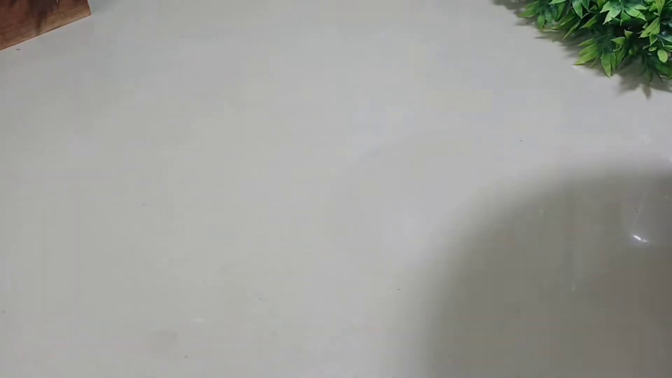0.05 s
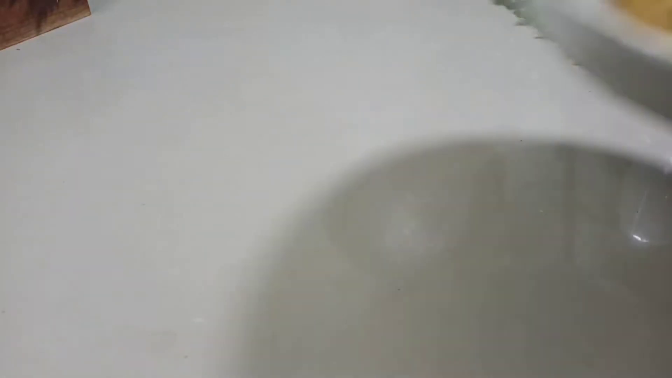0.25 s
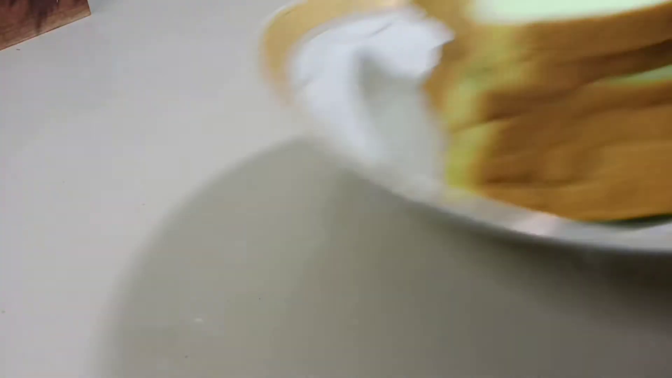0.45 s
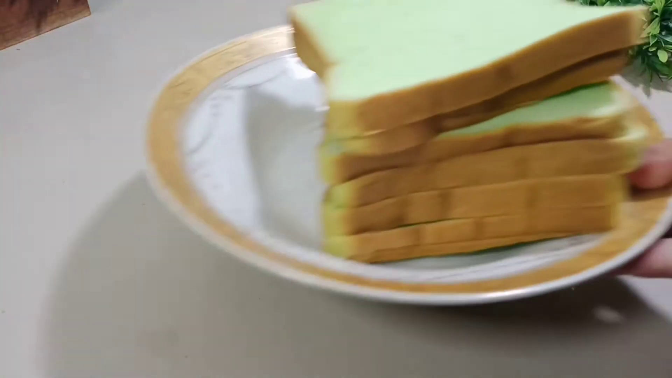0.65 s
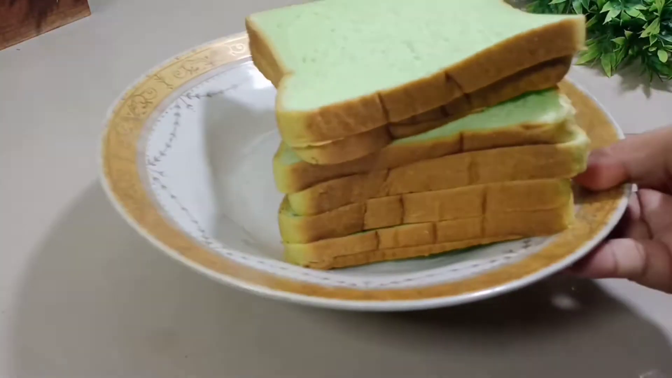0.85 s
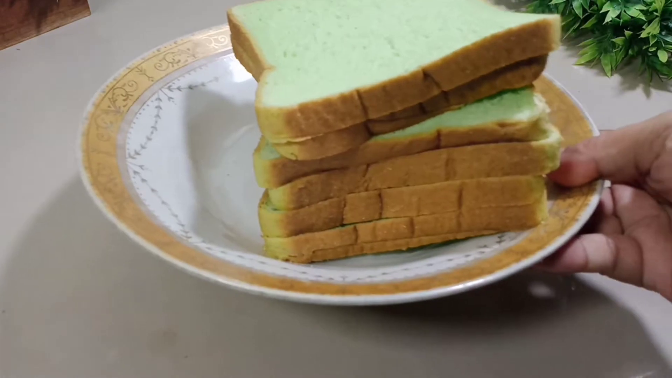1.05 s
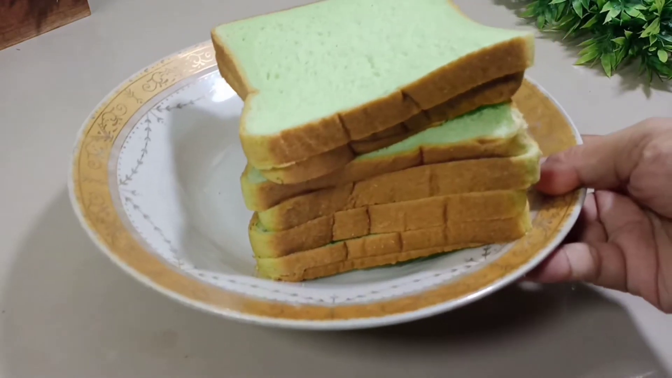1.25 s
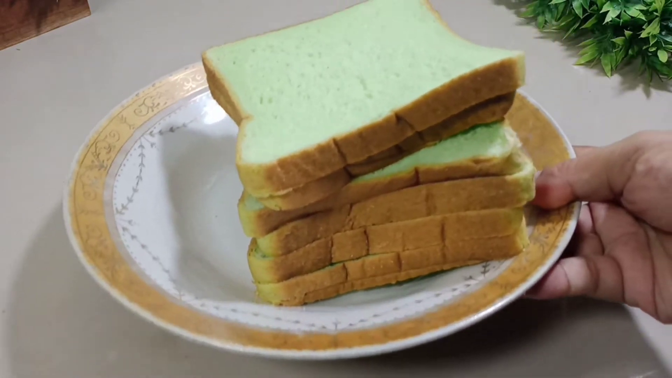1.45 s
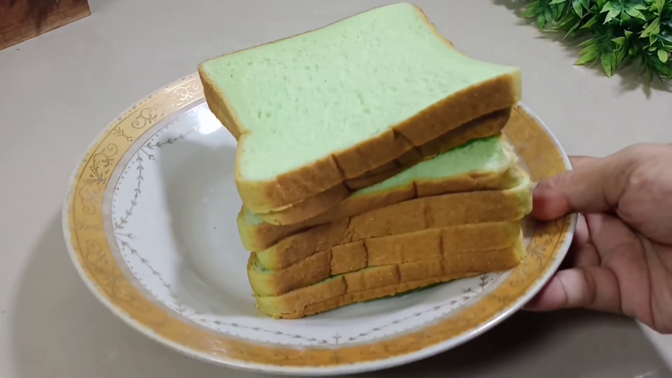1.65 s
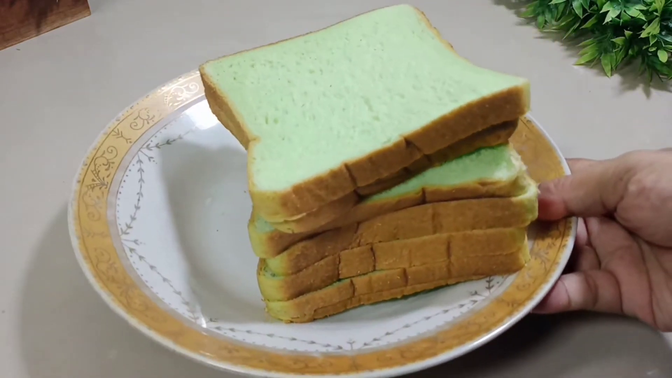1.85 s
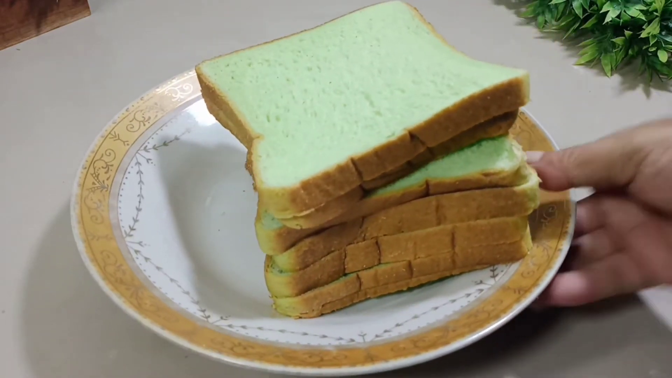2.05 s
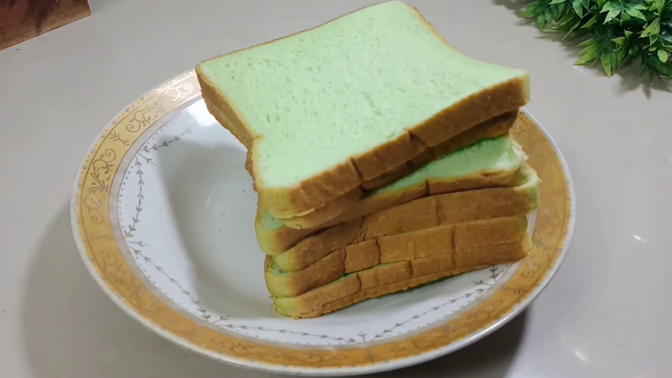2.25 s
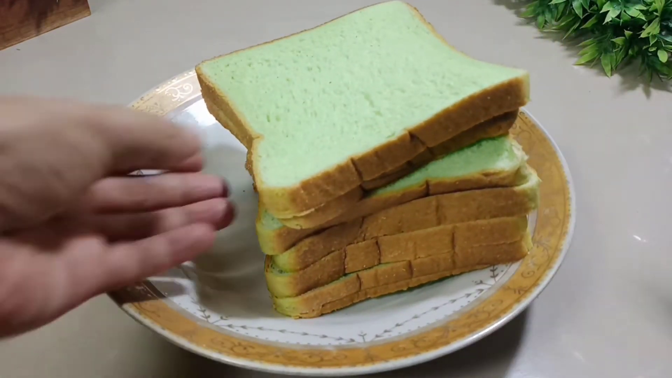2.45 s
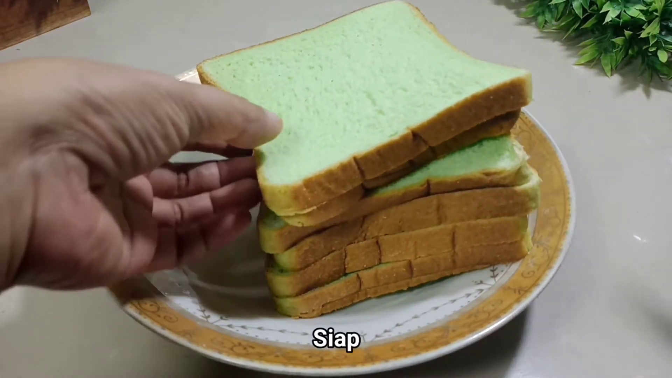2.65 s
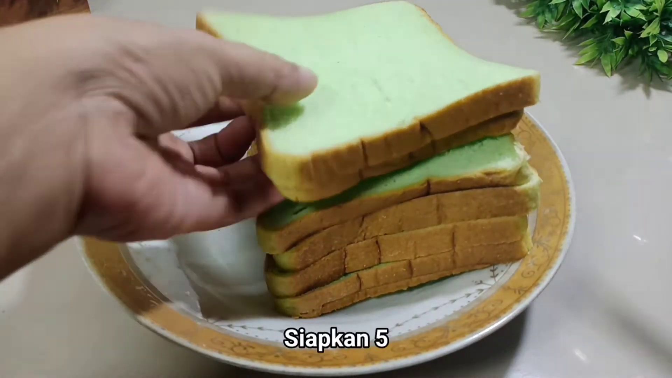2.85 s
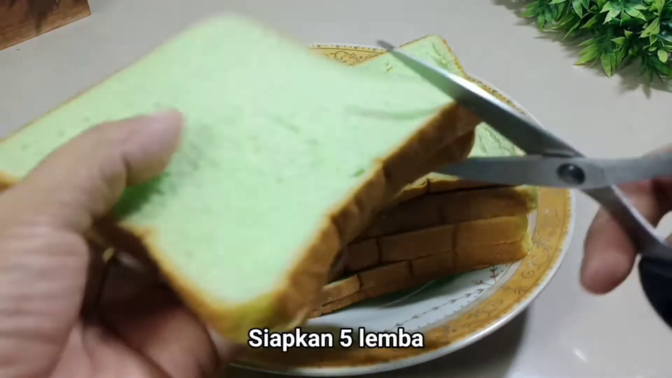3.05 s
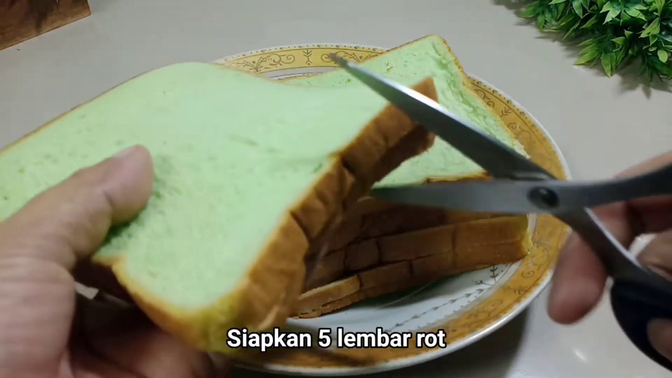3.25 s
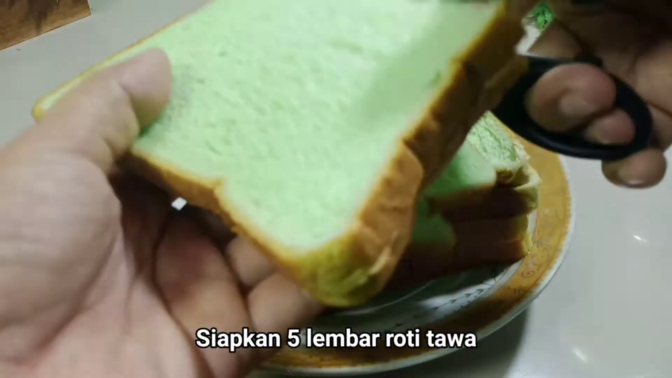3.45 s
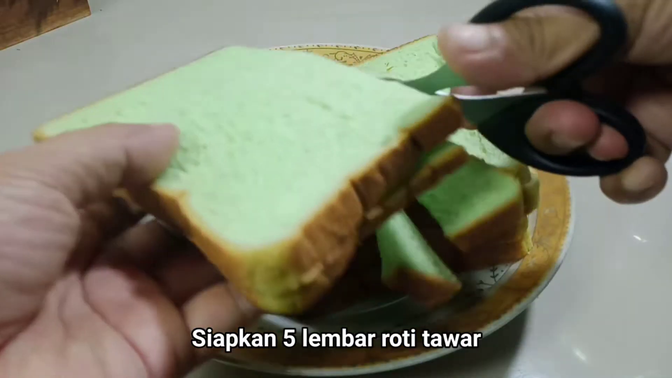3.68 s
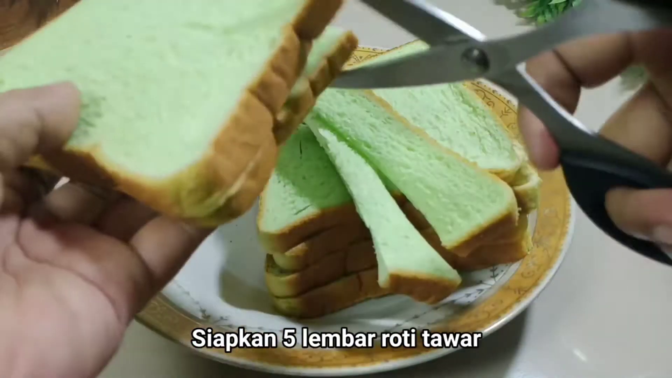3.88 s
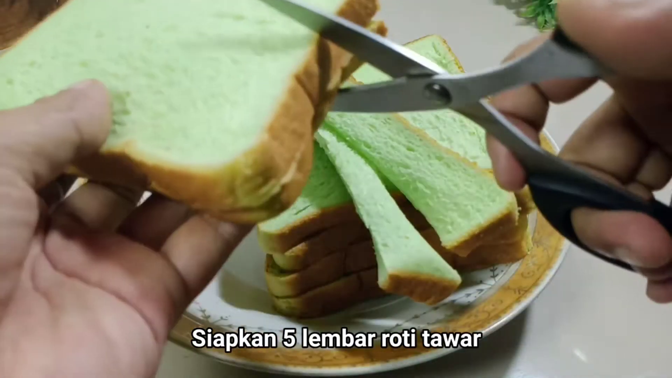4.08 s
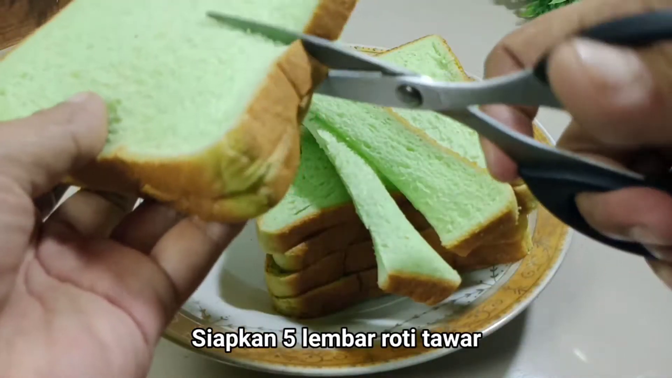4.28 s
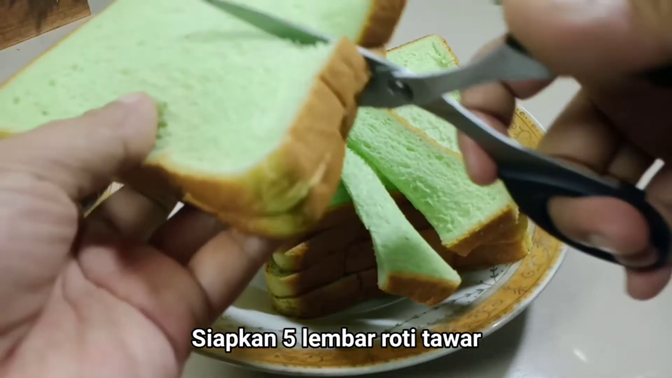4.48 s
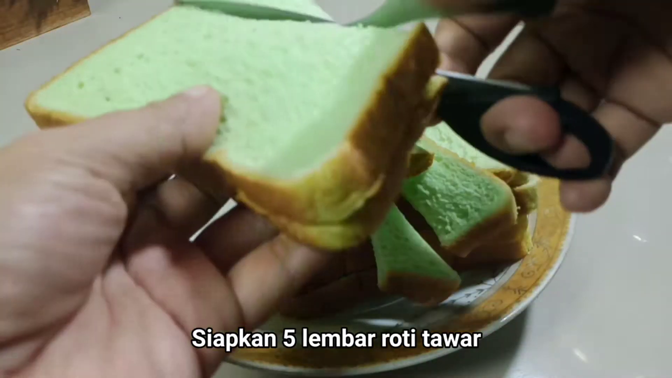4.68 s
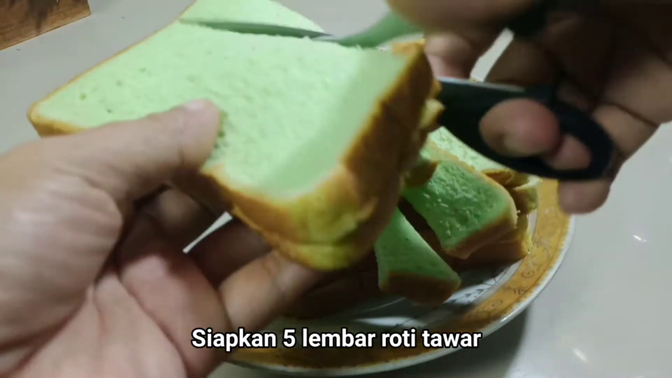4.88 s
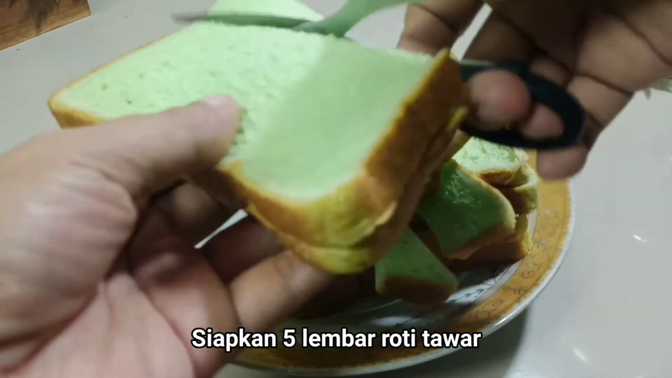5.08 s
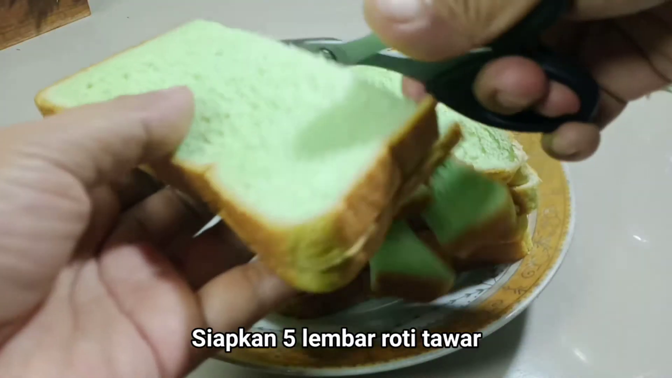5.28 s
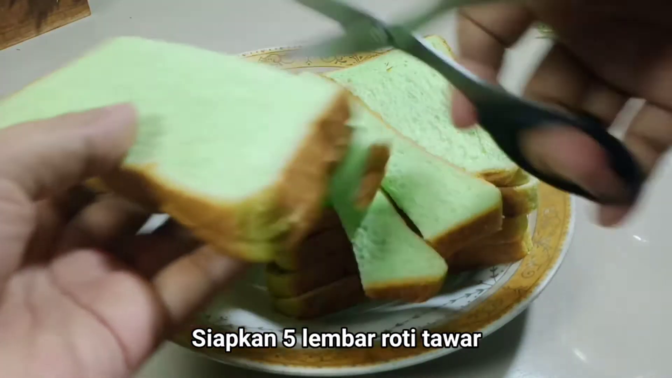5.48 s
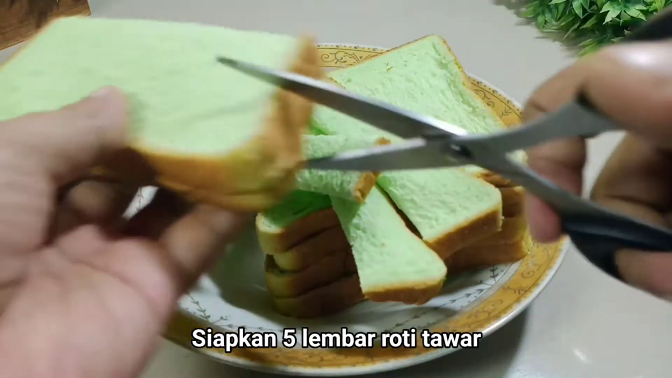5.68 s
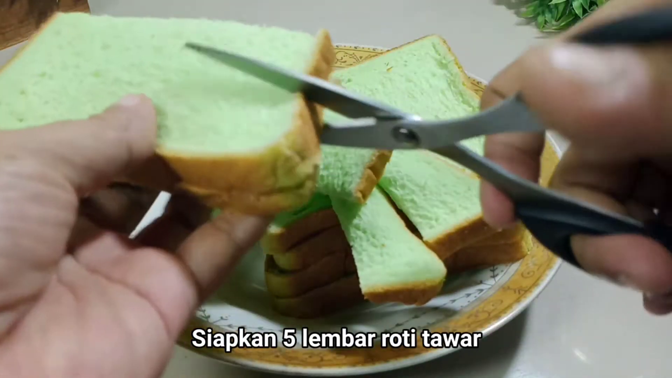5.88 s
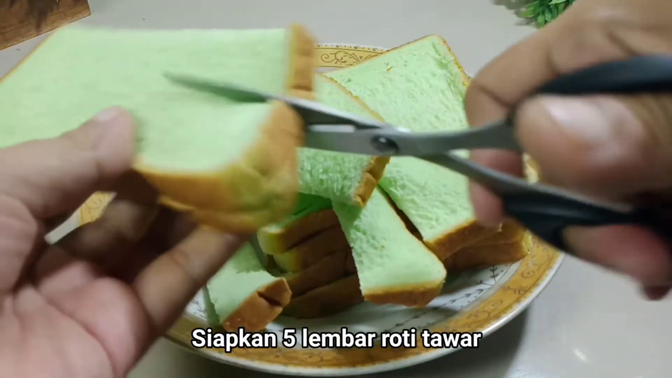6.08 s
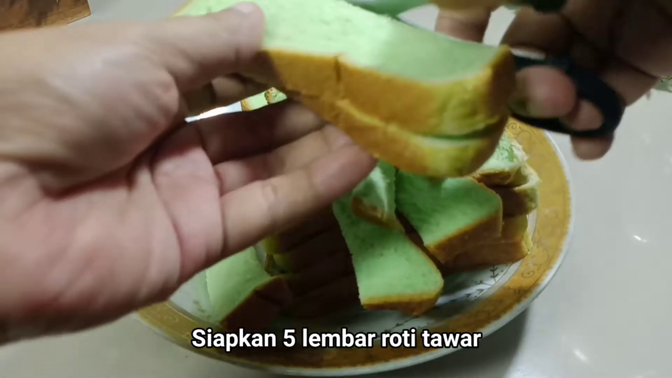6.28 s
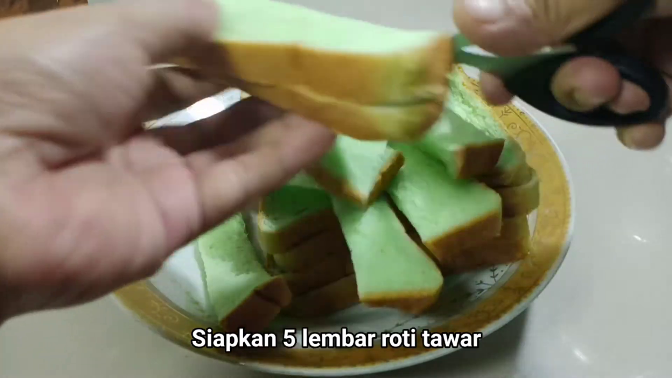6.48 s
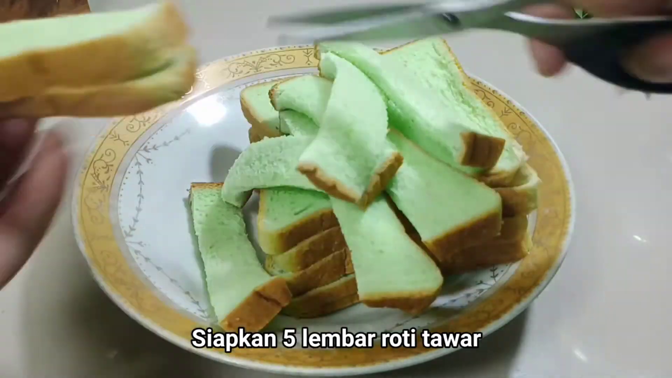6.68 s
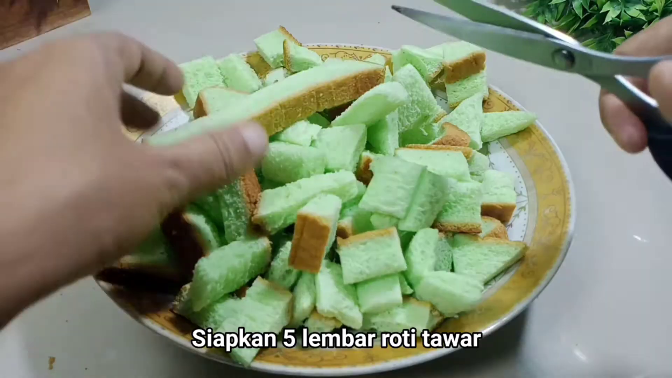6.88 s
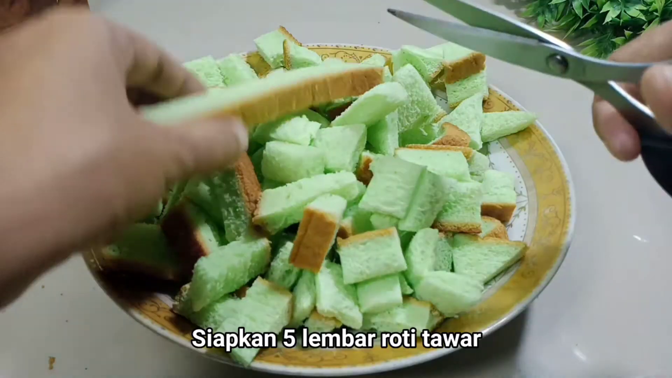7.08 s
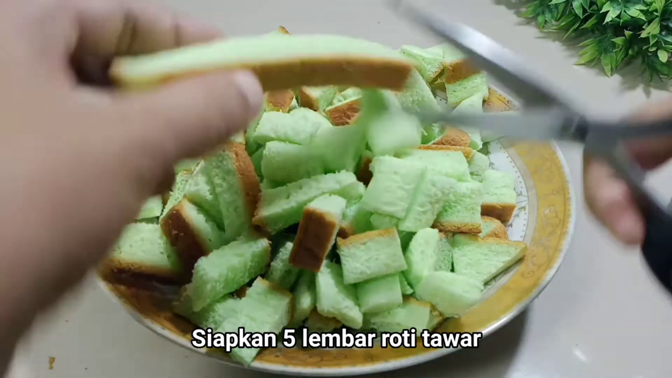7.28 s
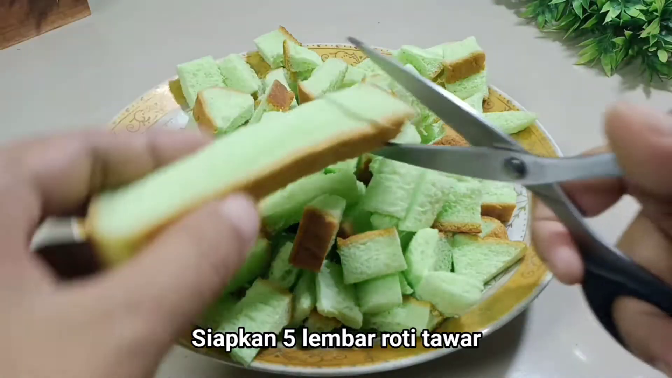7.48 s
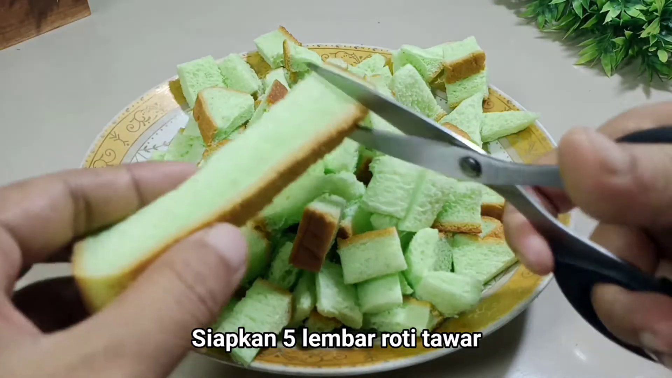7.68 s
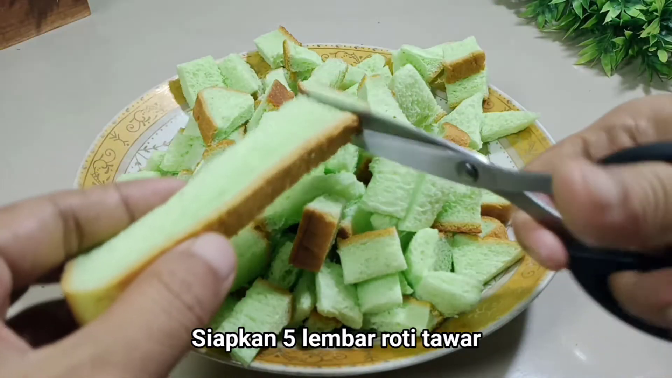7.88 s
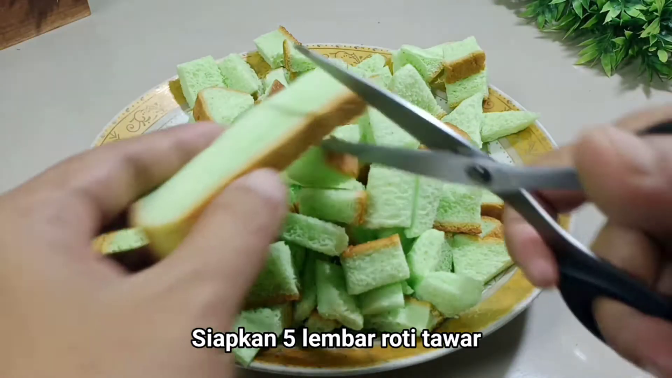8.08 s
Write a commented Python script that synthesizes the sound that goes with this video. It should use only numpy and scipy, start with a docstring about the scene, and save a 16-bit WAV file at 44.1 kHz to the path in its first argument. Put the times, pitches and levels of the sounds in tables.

```python
"""First you hear a china plate of bread judder, scrape and squeak over a glossy table as its foot ring
catches and slips. It is set down with a clatter. Kitchen scissors then cut the soft slices almost
silently: the handles clack shut and the pivot ticks as they open. Behind it all the kitchen hisses and
a distant motor hums. The sound runs in short stretches, some sped up, which raises the pitch of the
scissors and the background and makes the scissors ring more briefly."""
import sys
import numpy as np
from scipy import signal
from scipy.fft import rfft, irfft, next_fast_len
from scipy.io import wavfile

SR = 44100
rng = np.random.default_rng(int(sys.argv[2]) if len(sys.argv) > 2 else 0)


def int16_out(signal):
    """Quantize to a 16-bit WAV file."""
    q = np.round(np.clip(np.atleast_2d(signal).T, -1, 1) * 32767)
    wavfile.write(sys.argv[1], SR, q.astype(np.int16))


N = 358974
TIME = np.arange(N) / SR
RING_TIME = TIME[:SR // 2]   # half a second for a hit to ring out

# Stretches of sound. Each row: start in seconds, speed factor, then room noise, hum and whine in dB.
STRETCHES = [(0, 1.034, -49, -53, -60), (1.02, 1.01, -59, -65.5, -67.5), (2.0, 1.01, -63, -61, -77),
             (2.5, 1.42, -68.5, -72.5, -77.5), (3.5, 1.87, -69.5, -74.5, -79.5), (4.76, 1, -63, -70, -77),
             (5.5, 1.67, -71, -75.5, -83.5), (6.95, 1.01, -65, -70, -74.5)]
# Tone colours of five noises. Each row: frequency in Hz, relative level in dB.
SCRAPE_COLOUR = [(250, -29), (450, -8), (700, -2.5), (1100, 1.5), (1800, -1.5), (2700, -2), (4500, -6),
                 (6000, -10.5), (8500, -13), (11000, -16), (15000, -23)]
RUMBLE_COLOUR = [(21, -47), (35, -31), (54, -14), (168, 0.5), (273, -2), (360, -13.5), (429, -5.5),
                 (559, -13), (700, -11.5), (910, -40), (1540, -120)]
ROOM_COLOUR = [(20, -22), (50, -9.5), (85, -5.5), (140, -4.5), (200, -8), (300, -9.5), (450, -14.5),
               (800, -16.5), (2000, -21), (4600, -25.5), (7200, -31.5), (8400, -28.5), (11000, -34),
               (15000, -37)]
CLATTER_COLOUR = [(50, -25), (130, -11), (300, -7.5), (500, -1), (750, 4), (1200, -3), (1700, -2),
                  (2500, -1), (4000, -9.5), (6000, -13.5), (9000, -16), (11000, -20.5), (15000, -27)]
CRUMB_COLOUR = [(500, -16), (2000, -6), (6000, -2), (9000, -6.5), (15000, -2.5)]
# Notes of the sliding plate. Each row: start and length in seconds, pitch in Hz, drop by the end in Hz,
# curve of the drop (1 is straight), level in dB, fade-in in seconds, fade-out in dB per second.
JUDDER_NOTES = [(0, 0.21, 64.1, 2.2, 0.7, -47.5, 0.015, 31), (.25, 0.468, 62.5, 0.41, 2.2, -43, 0.035, -6)]
SQUEAK_NOTES = [(.272, .205, 3200, 210, .85, -41, 0.016, 18), (.38, 0.08, 2090, 17, 1, -58, .015, 12),
                (.435, 0.12, 1414, 34, 1, -47.5, 0.017, 45)]
SQUEAL_NOTES = [(.44, 0.29, 2016, 513, 1.88, -31.5, 0.039, 40.4),
                (.695, 0.11, 1435, 193.7, 0.97, -37.5, 0.012, 13),
                (.785, 0.11, 1095, 229.6, 0.82, -45, 0.011, 10)]
# Overtones of those notes. Each row: multiple of the pitch, relative level in dB.
JUDDER_OVERTONES = [(1, -11), (2, 2.5), (3, -18), (4, -9), (5, -4), (6, -11)]
SQUEAK_OVERTONES = [(1, 5.5), (2, -12.5), (3, -40)]
SQUEAL_OVERTONES = [(1, 1), (2, -6.5), (3, -10), (4, -23), (5, -23.5), (6, -28), (7, -32)]
# Swells. Each row: peak time in seconds, level in dB, seconds to rise by 20 dB, seconds to fall by 20 dB.
FOOT_BITES = [(0.096, -39, 0.02, 0.18), (.785, -39.5, 0.19, 0.33)]   # the foot ring bites into the table
HUM_SWELLS = [(4.45, 4.5, 0.98, 0.81)]   # level counted from the steady hum
BREAD_RUBS = [(1.031, -62, 0.041, 1.2), (2.421, -74, 0.68, .15), (3.15, -84, 2.5, 1.1),
              (5.02, -73, .2, 0.14), (5.57, -88, 0.16, .15), (5.75, -81.5, 0.11, .11),
              (6.13, -74, .12, .11), (7.5, -85, 1.2, 1.5), (7.975, -55.5, .025, 0.075), (8.1, -73, .2, .4)]   # fingers and blades rub the bread
# Ringing tones at normal speed. Each row: pitch in Hz, width in Hz (narrow rings longer), level in dB.
MOTOR_TONES = [(73.3, 9, -1), (118, 16, -6)]
PLATE_TONES = [(130.2, 6, -9), (268, 20, -0.5), (330, 32, 3.5), (412, 20, 2.5), (530, 27, -3), (668, 52, 0),
               (733, 59, 3), (777, 9.2, -0.5), (1050, 64, -1), (1353, 80, 3), (1794, 45, -10.5),
               (2140, 50, -4), (2470, 140, -4.5), (8520, 240, -12)]   # plate and table together
RIM_TONES = [(2650, 29, 1), (3240, 18, 6), (4400, 29, -1), (5700, 29, -1), (6900, 55, -5), (8420, 29, -7),
             (10400, 60, -13)]
HANDLE_TONES = [(1930, 570, -2), (3300, 700, -3.5), (4600, 2600, -4), (7160, 560, 3), (8400, 530, 4),
                (9460, 1000, 1), (12300, 1500, -5.5), (14950, 800, -7)]
BLADE_TONES = [(1350, 330, 1.5), (3210, 280, 1), (6070, 1500, -5), (7060, 420, 0), (8870, 1300, 4),
               (11890, 1100, -2), (14600, 1800, -3)]
# The motor speeds up. Each row: peak time in seconds, added Hz at normal speed, rise and fall in seconds.
MOTOR_SURGES = [(3.42, 40.07, .55, .1), (4.0, 40, .85, 1.2)]
# The background dips briefly. Each row: time in seconds, depth in dB, seconds to sink, seconds to return.
BACKGROUND_DIPS = [(4.76, 16.5, 0.092, .11), (6.335, 7.5, .045, .055), (6.93, 5, 0.2, 0.082)]
# The plate hits the table. Each row: start in seconds, level in dB, Hz above which the knock is dulled.
PLATE_KNOCKS = [(0.0979, -14.5, 7000), (1.590, 14.5, 5570), (1.799, -4.5, 1750), (1.823, 8.5, 2420),
                (1.832, 6, 4940), (1.8424, 11, 8000), (1.8448, 8.5, 1800), (1.9217, 2, 3020),
                (1.926, -1.5, 800)]
# A fingernail brushes the rim. Each row: start in seconds, level in dB.
RIM_CLINKS = [(2.08, -30)]
# The handles shut. Each row: time in seconds, level in dB, brightness in dB per octave, relative thump dB.
HANDLE_CLACKS = [(3.6790, -2.5, -0.6, -15), (5.2969, 12.5, 2, -24), (6.42, -2.5, 1, -13.5),
                 (7.9875, 7, -2.5, -5.5)]
# The blades part. Each row: start in seconds, level in dB.
PIVOT_TICKS = [(3.7677, -26.5), (5.4566, -15), (6.55, -26.5), (8.1059, -14.5)]
# The kitchen's echo. Each row: frequency in Hz, seconds to fade by 60 dB, both at normal speed.
ECHO_TIMES = [(150, .4), (700, 0.33), (2000, .36), (5000, 0.27), (9000, 0.22), (15000, .22)]

SLIDE_END_S, CUTOFF_HZ = STRETCHES[1][0], 15550
PORT_HZ, PORT_WIDTH_HZ, PORT_DB = 8220, 1200, 3.5   # the microphone's opening rings (Hz at normal speed)


def from_db(db):
    """Turn decibels into a volume factor."""
    return 10 ** (np.asarray(db) / 20)


def rms_one(x):
    """Scale a sound to an average power of 1."""
    return x / np.sqrt(np.mean(x ** 2) + 1e-20)


def unit_energy(x):
    """Scale a sound to a total energy of 1."""
    return x / np.sqrt(np.sum(x ** 2) + 1e-20)


def add(out, s, x):
    """Mix x into out, starting at s seconds."""
    at = max(round(s * SR), 0)
    out[at:at + len(x)] += x[:N - at]


def drift(rate_hz, count=N):
    """A smooth random wobble, about 1 in size."""
    r = np.exp(-2 * np.pi * rate_hz / SR)
    return rms_one(signal.lfilter([1], [1, -2 * r, r * r], rng.standard_normal(count)))


def colour(x, spectrum, speed=1):
    """Give a sound a tone colour, shifted up by speed."""
    size = 2 * next_fast_len(len(x))
    hz, db = np.transpose(spectrum)
    level = np.interp(np.log(np.fft.rfftfreq(size, 1 / SR) / speed + 1), np.log(hz), db)
    cepstrum = irfft(np.log(from_db(level)))[:size // 2]   # keep half, so nothing rings before a hit
    cepstrum[1:] *= 2
    return irfft(rfft(x, size) * np.exp(rfft(cepstrum, size)))[:len(x)]


def resonate(x, hz, width_hz):
    """Make a sound ring at one pitch."""
    r, angle = np.exp(-np.pi * width_hz / SR), 2 * np.pi * hz / SR
    return signal.lfilter(np.array([1, 0, -1]) * (1 - r * r) / 2, [1, -2 * r * np.cos(angle), r * r], x + 1e-18)


def ring(x, tones, speed=1):
    """An object rings at several pitches; every other one is flipped, and any too high are skipped."""
    return sum((-1) ** k * from_db(db) * resonate(x, hz * speed, width * speed)
               for k, (hz, width, db) in enumerate(tones) if hz * speed < SR / 2)


def distance(s, rise_s, fall_s):
    """Distance from time s: 0 there, 1 at rise_s before and at fall_s after."""
    return np.maximum((s - TIME) / rise_s, (TIME - s) / fall_s)


def ramps(rows):
    """Straight rises and falls, with zero in between."""
    return sum(height * np.maximum(1 - distance(s, rise, fall), 0) for s, height, rise, fall in rows)


def swells(steady_db, rows):
    """Volume of a steady sound with swells on top."""
    power = sum(from_db(db - 20 * np.minimum(distance(s, rise, fall), 10)) ** 2
                for s, db, rise, fall in rows)
    return np.sqrt(from_db(steady_db) ** 2 + power)


def grains(per_s, spread_db):
    """Tiny slips of uneven size at random moments."""
    out, at = np.zeros(N), np.flatnonzero(rng.random(N) < per_s / SR)
    size, sign = rng.exponential(1, N)[at], np.sign(rng.random(N)[at] - .5)
    out[at] = sign * from_db(spread_db * np.minimum(size, 5))
    return out


def kitchen_echo(x, tail_db, early_db, speed=1):
    """Add quick echoes off table and hands, and a tail whose high notes die first."""
    hz, fade_times = np.transpose(ECHO_TIMES)
    count, age = len(RING_TIME), RING_TIME * speed
    noise = rfft(rng.standard_normal(count))
    pitch = np.log(np.fft.rfftfreq(count, 1 / SR) / speed + 1)
    tail = sum(irfft(noise * np.interp(pitch, np.log(hz), band), count) * from_db(-60 * age / fade_s)
               for band, fade_s in zip(np.eye(len(hz)), fade_times))
    early = rng.standard_normal(count) * from_db(-60 * age / .036)
    echoes = from_db(tail_db) * unit_energy(tail * (age > .006))
    echoes += from_db(early_db) * unit_energy(early * (age > .001))
    return x + signal.fftconvolve(x, echoes)[:len(x)]


def scrape(slips):
    """The foot ring scrapes in many tiny slips, and specks of grit tick under it."""
    rasp = swells(steady_db=-54, rows=FOOT_BITES) * rms_one(colour(slips, SCRAPE_COLOUR))
    grit = from_db(-59) * rms_one(colour(grains(per_s=160, spread_db=3), CRUMB_COLOUR))
    return rasp + grit


def chirp(slips, hold_s=.054, fade_db_per_s=348):
    """The slips ring in a hoarse chirp as the plate starts to move."""
    db = -49 - fade_db_per_s * np.clip(TIME - hold_s, 0, 1)
    return from_db(db) * rms_one(resonate(resonate(slips, 2860, 500), 2840, 500))


def table_rumble():
    """The table rumbles most as the plate stops, and gives way while the plate judders."""
    braking = (.894, -35, .1, .21)   # peak time, dB, rise, fall
    gain = swells(steady_db=-42.5, rows=[braking])
    rumble = rms_one(colour(grains(per_s=1500, spread_db=1), RUMBLE_COLOUR))
    judder_gain = sum(note_shape(*row)[1] for row in JUDDER_NOTES)
    return gain * rumble / (1 + judder_gain / from_db(-41))   # a judder at -41 dB halves it


def note_shape(start, length, hz, drop_hz, curve, db, attack_s, fade_db_per_s, release_s=.024):
    """Pitch and volume of one note: the foot ring catches, the pitch sinks as it slows, and it lets go."""
    age = np.clip(TIME - start, 0, length)
    gate = np.clip(age / attack_s, 0, 1) ** 2 * np.clip((length - age) / release_s, 0, 1)
    return hz - drop_hz * (age / length) ** curve, from_db(db - fade_db_per_s * age) * gate


def stick_slip(notes, overtones, jitter, flutter_db, wobble_hz):
    """Regular catching and slipping makes fluttering notes that grow ragged as they sink."""
    out, count = np.zeros(N), round(SLIDE_END_S * SR)
    for row in notes:
        hz, gain = (x[:count] for x in note_shape(*row))
        ragged = np.minimum(jitter * (hz[0] / np.maximum(hz, 1)) ** 3.7, .05)
        phase = 2 * np.pi * np.cumsum(hz * (1 + ragged * drift(wobble_hz, count))) / SR
        note = sum(from_db(db + flutter_db * drift(wobble_hz, count)) * np.sin(multiple * phase)
                   for multiple, db in overtones)
        out[:count] += rms_one(note) * gain
    return out


def sliding_plate():
    """The plate scrapes, judders and squeaks; its squeal sinks, breaks off and catches again lower."""
    slips = grains(per_s=7600, spread_db=2)
    scraping = scrape(slips) + chirp(slips)
    rumble = table_rumble()
    judder = stick_slip(JUDDER_NOTES, JUDDER_OVERTONES, jitter=.0044, flutter_db=1.5, wobble_hz=4.9)
    squeak = stick_slip(SQUEAK_NOTES, SQUEAK_OVERTONES, jitter=.0055, flutter_db=1, wobble_hz=180)
    squeal = stick_slip(SQUEAL_NOTES, SQUEAL_OVERTONES, jitter=.00685, flutter_db=1.5, wobble_hz=128)
    friction = kitchen_echo(scraping + squeak + squeal, tail_db=-4.5, early_db=-4.5)
    return (friction + rumble + judder) * (TIME < SLIDE_END_S)


def room_noise(noise, speed):
    """The kitchen's soft hiss and rumble."""
    return rms_one(colour(noise, ROOM_COLOUR, speed))


def motor_hum(noise, speed):
    """A distant motor drones in low, wavering tones."""
    hum = sum(from_db(db) * rms_one(resonate(resonate(noise, hz * speed, width), hz * speed, width))
              for hz, width, db in MOTOR_TONES)
    return rms_one(hum)


def motor_whine(speed, surge_hz, base_hz=323):
    """The motor's faint upper note wavers, and rises with each surge."""
    hz = speed * (base_hz + surge_hz) * (1 + .025 * drift(49, len(surge_hz)))
    return from_db(3.1 * drift(8, len(hz))) * np.sin(2 * np.pi * np.cumsum(hz) / SR)


def tap(spread_ms):
    """A hard contact. High notes travel fastest as the object bends, so the click sweeps downward."""
    hz = np.fft.rfftfreq(len(RING_TIME), 1 / SR)
    delay_s = spread_ms * np.clip(1 - hz / CUTOFF_HZ, 0, 1) / 1000 + 8 / SR
    return irfft(np.exp(-2j * np.pi * np.cumsum(delay_s) * hz[1]), len(RING_TIME)) * (RING_TIME < .01)


def plate_knocks():
    """Knocks ring the table and the plate, muffled by its bread. A fingernail rings only the rim."""
    out = np.zeros(N)
    for s, db, hardness_hz in PLATE_KNOCKS:
        burst = rng.standard_normal(len(RING_TIME)) * from_db(-60 * RING_TIME / .05)
        crack = unit_energy(colour(burst, CLATTER_COLOUR))
        ringing = from_db(-3.5) * unit_energy(ring(tap(spread_ms=.87), PLATE_TONES))
        dulling = signal.butter(1, hardness_hz, fs=SR)   # softer contacts sound duller
        add(out, s, from_db(db) * signal.lfilter(*dulling, crack + ringing))
    for s, db in RIM_CLINKS:
        add(out, s, from_db(db) * unit_energy(ring(tap(spread_ms=.94), RIM_TONES)))
    return kitchen_echo(out, tail_db=-9, early_db=-13.5)


def bread_crackle():
    """Soft bread gives only a faint, fine crackle, which swells with each rub."""
    gain = swells(steady_db=-90, rows=BREAD_RUBS) * from_db(1.7 * drift(9.9))
    return gain * rms_one(colour(grains(per_s=5000, spread_db=5), CRUMB_COLOUR))


def speed_at(s):
    """Speed factor of the stretch at s seconds."""
    return [speed for start, speed, *_ in STRETCHES if start <= s][-1]


def blade_rub(length_s, rise_db):
    """The edges rub faster and faster just before they close."""
    age = RING_TIME[RING_TIME < length_s]
    return unit_energy(rng.standard_normal(len(age)) * from_db(rise_db * (age / length_s - 1)))


def scissor_clacks():
    """The blades rub, then the handles meet, ring and thump in the hand."""
    out = np.zeros(N)
    for s, db, brightness, thump_db in HANDLE_CLACKS:
        speed = speed_at(s)
        blow, rub_s = tap(spread_ms=1.5 / speed), .006 / speed
        tones = [(hz, width, level + brightness * np.log2(hz / 5000)) for hz, width, level in HANDLE_TONES]
        clack = ring(blow, tones, speed) + from_db(thump_db) * resonate(blow, 240 * speed, 130 * speed)
        add(out, s, from_db(db) * kitchen_echo(clack, tail_db=-13.5, early_db=-11, speed=speed))
        add(out, s - rub_s, from_db(db - 20.5) * ring(blade_rub(rub_s, rise_db=22.5), tones, speed))
    return out


def scissor_ticks():
    """The loose pivot ticks on opening and rings the blades."""
    out = np.zeros(N)
    for s, db in PIVOT_TICKS:
        speed = speed_at(s)
        tick = ring(tap(spread_ms=.65 / speed), BLADE_TONES, speed)
        add(out, s, from_db(db) * kitchen_echo(tick, tail_db=-8.5, early_db=-1, speed=speed))
    return out


def scene():
    """Mix stretch by stretch; the background and the microphone's ring rise in pitch with the speed."""
    action = sliding_plate() + plate_knocks() + scissor_clacks() + scissor_ticks() + bread_crackle()
    dip_gain = from_db(-ramps(BACKGROUND_DIPS))
    hum_gain, surge_hz = swells(0, HUM_SWELLS), ramps(MOTOR_SURGES)
    edges = [round(row[0] * SR) for row in STRETCHES] + [N]
    air, engine = rng.standard_normal((2, N + SR))
    pieces = []
    for (_, speed, room_db, hum_db, whine_db), a, b in zip(STRETCHES, edges, edges[1:]):
        room = from_db(room_db) * room_noise(air[a:b], speed)
        hum = from_db(hum_db) * hum_gain[a:b] * motor_hum(engine[a:b + SR], speed)[SR:]   # skip build-up
        whine = from_db(whine_db) * motor_whine(speed, surge_hz[a:b])
        port = from_db(PORT_DB) * resonate(action[a:b], PORT_HZ * speed, PORT_WIDTH_HZ * speed)
        pieces.append(action[a:b] + port + (room + hum + whine) * dip_gain[a:b])
    mid = np.concatenate(pieces)
    # left and right are almost alike
    side = from_db(-33.5) * signal.fftconvolve(mid, unit_energy(rng.standard_normal(200)))[:N]
    return np.array([mid + side, mid - side])


def record(dry):
    """Round off the loudest peaks and remove the highest treble."""
    rounded = .8 * np.tanh(dry / .8)
    return signal.sosfilt(signal.ellip(10, .1, 80, CUTOFF_HZ, fs=SR, output="sos"), rounded)


dry = scene()
out = record(dry)
int16_out(out)
```